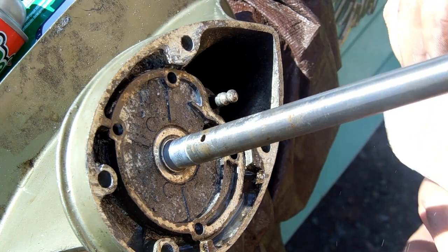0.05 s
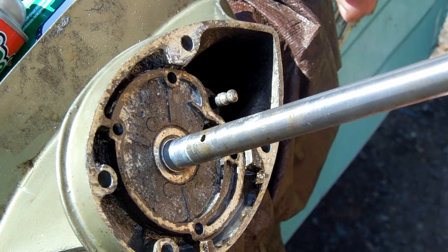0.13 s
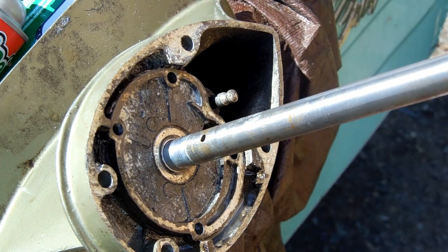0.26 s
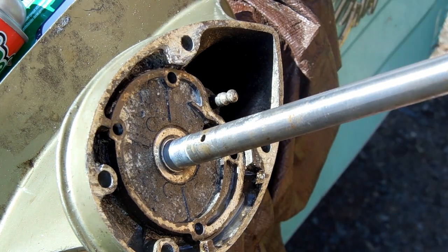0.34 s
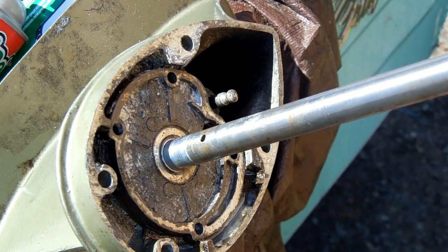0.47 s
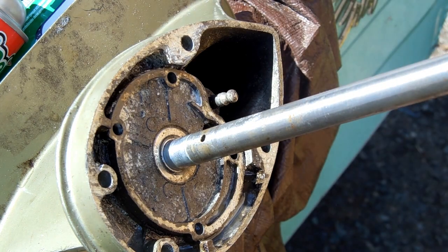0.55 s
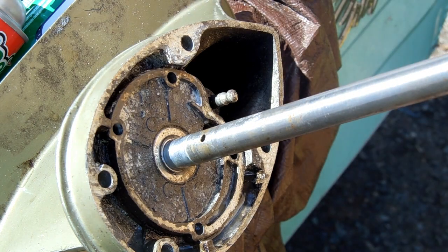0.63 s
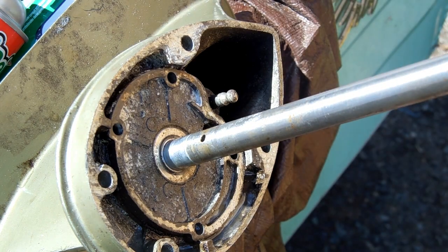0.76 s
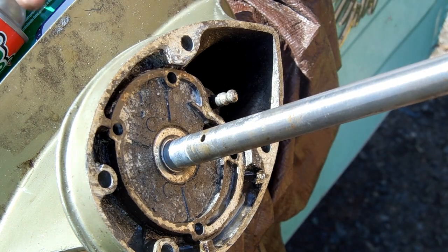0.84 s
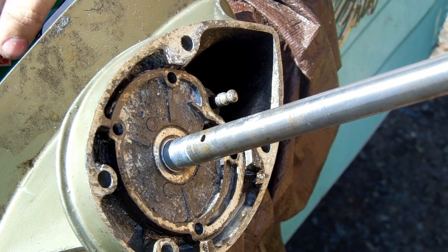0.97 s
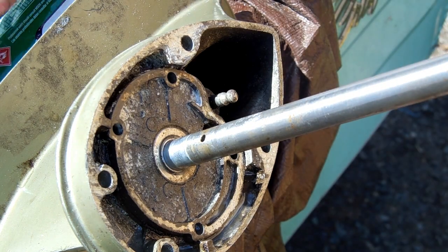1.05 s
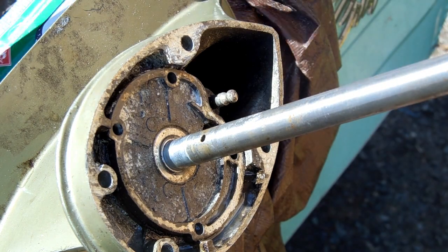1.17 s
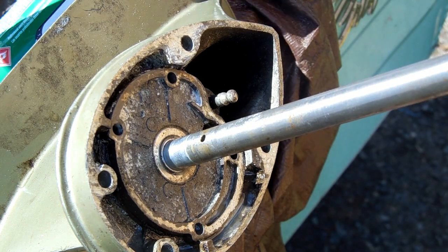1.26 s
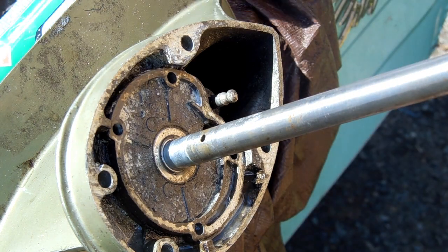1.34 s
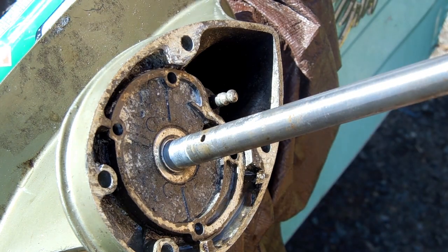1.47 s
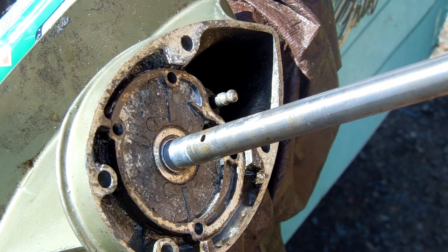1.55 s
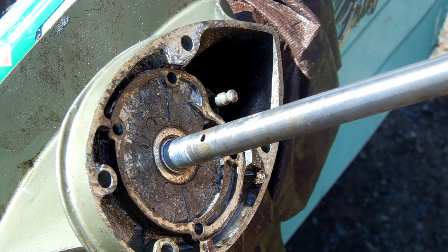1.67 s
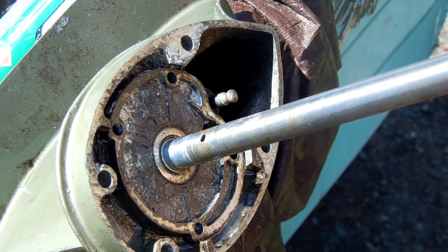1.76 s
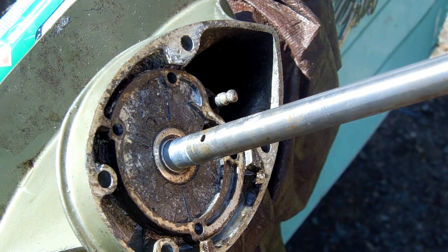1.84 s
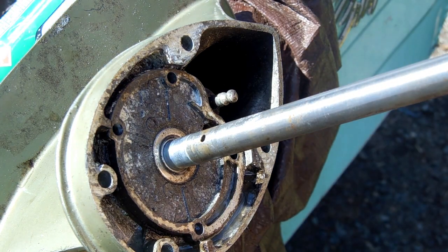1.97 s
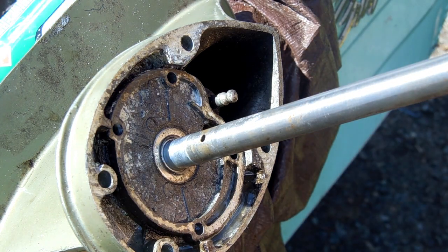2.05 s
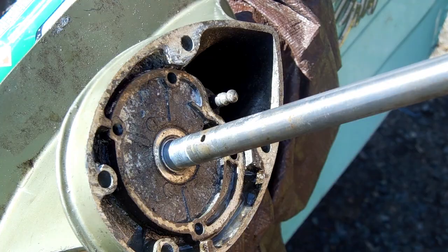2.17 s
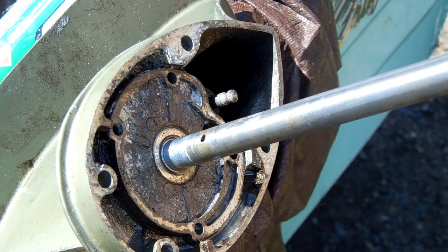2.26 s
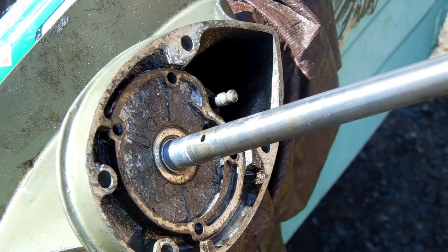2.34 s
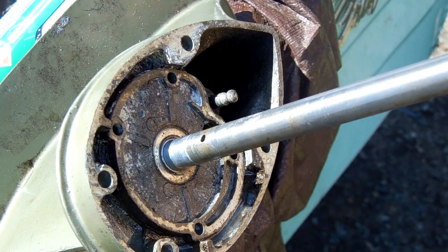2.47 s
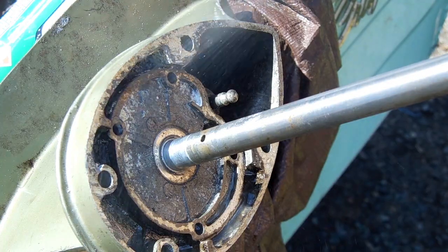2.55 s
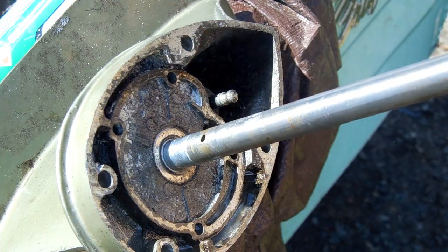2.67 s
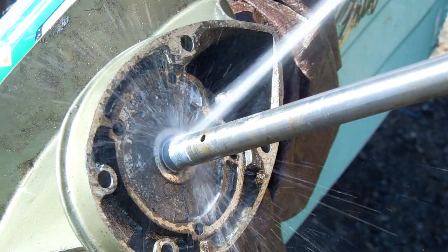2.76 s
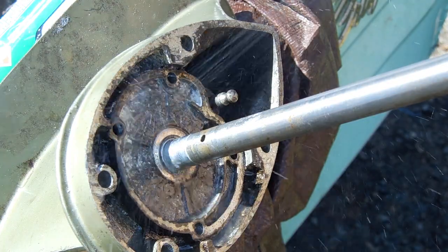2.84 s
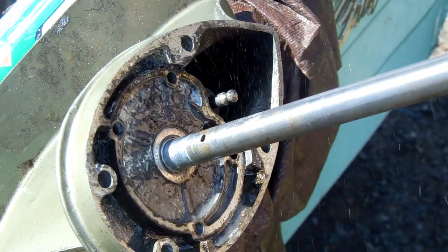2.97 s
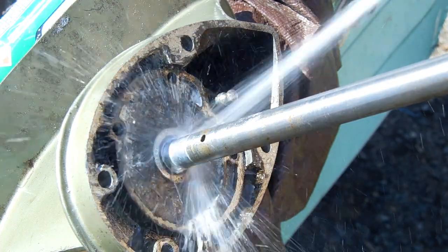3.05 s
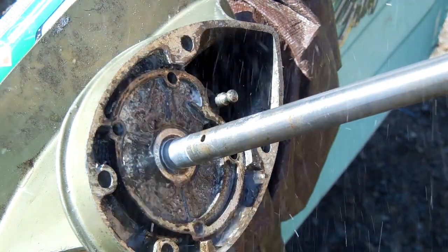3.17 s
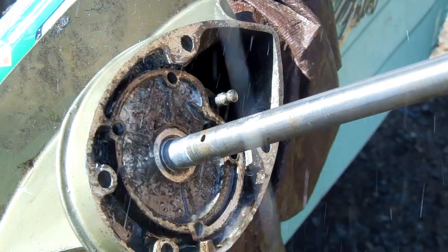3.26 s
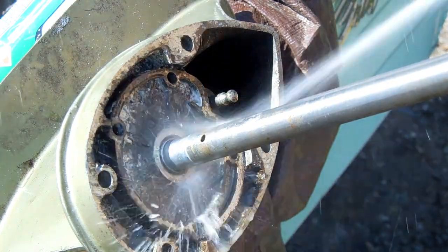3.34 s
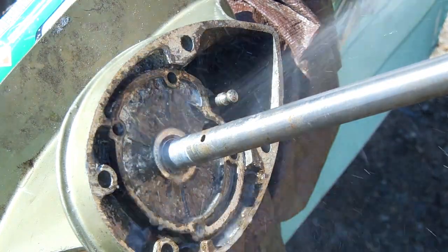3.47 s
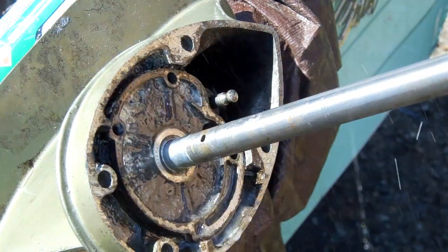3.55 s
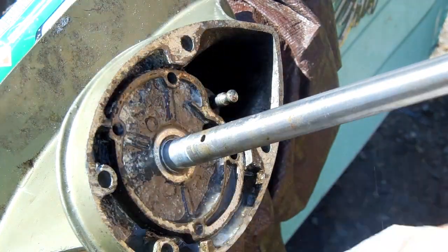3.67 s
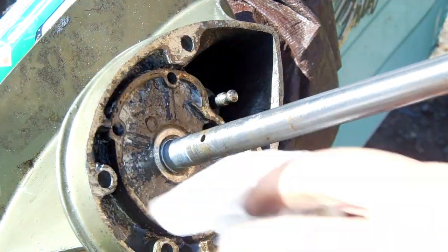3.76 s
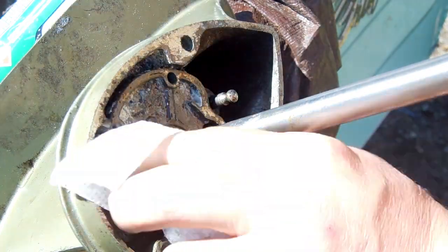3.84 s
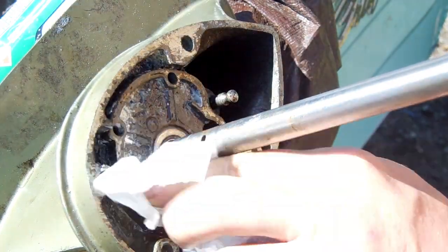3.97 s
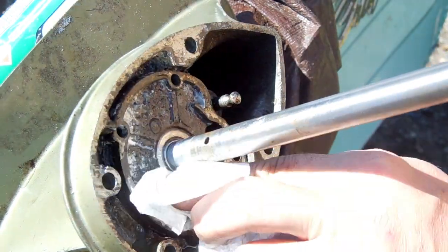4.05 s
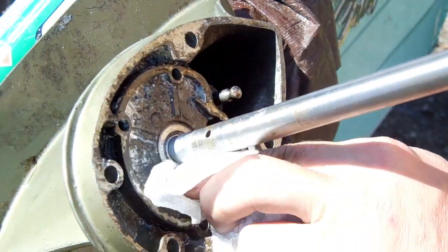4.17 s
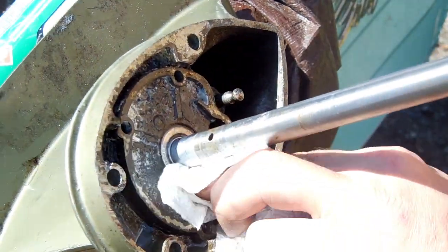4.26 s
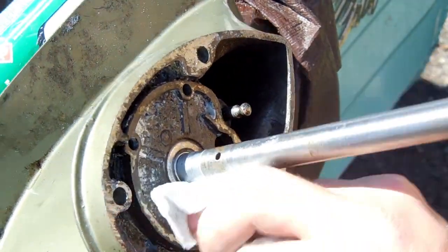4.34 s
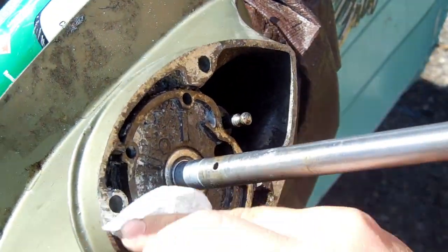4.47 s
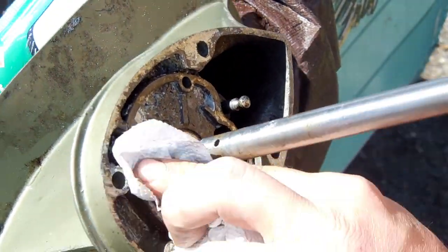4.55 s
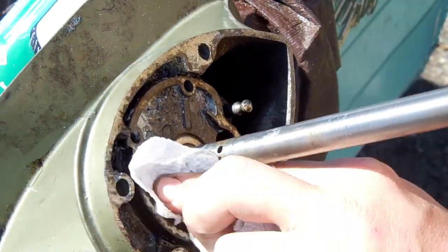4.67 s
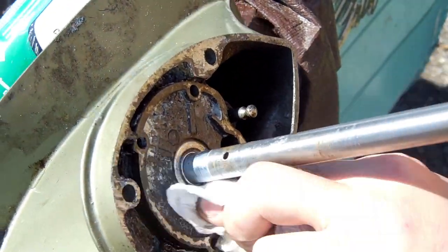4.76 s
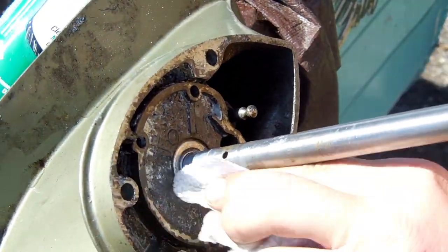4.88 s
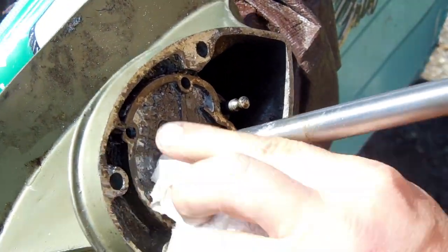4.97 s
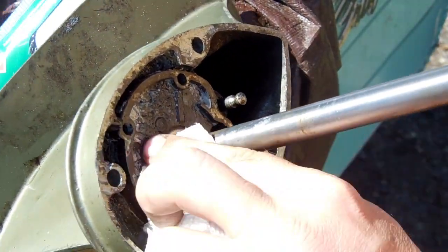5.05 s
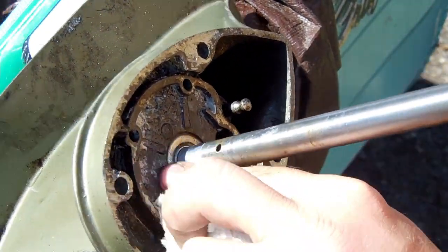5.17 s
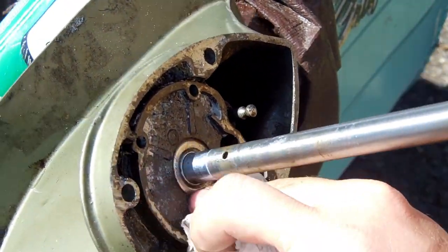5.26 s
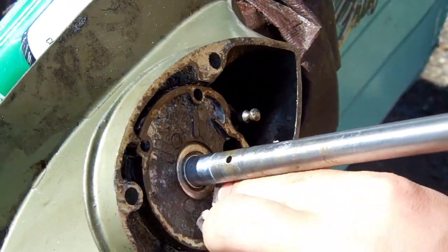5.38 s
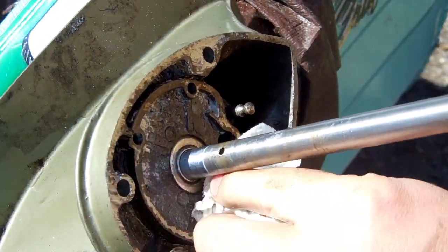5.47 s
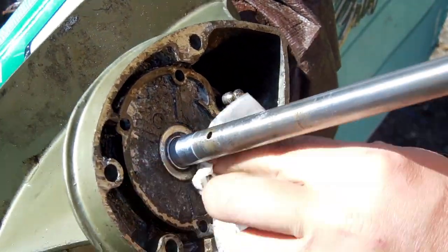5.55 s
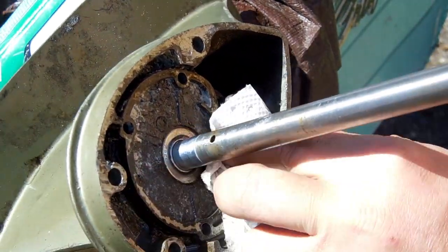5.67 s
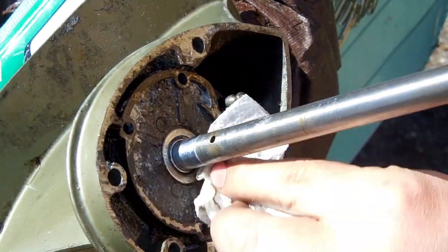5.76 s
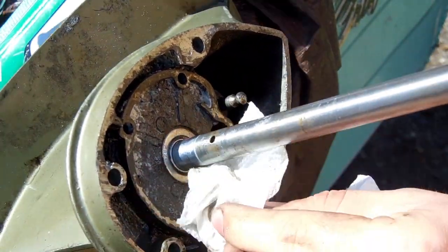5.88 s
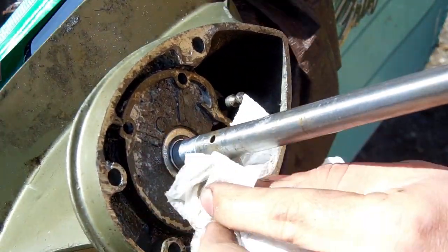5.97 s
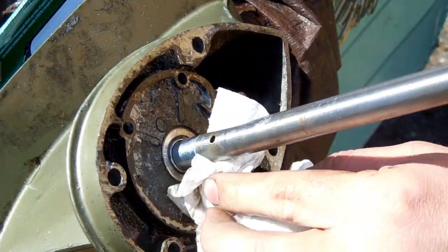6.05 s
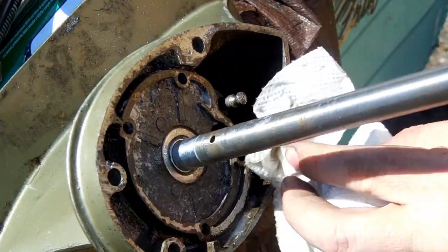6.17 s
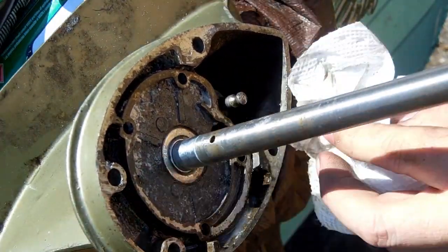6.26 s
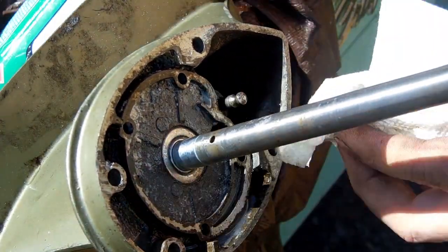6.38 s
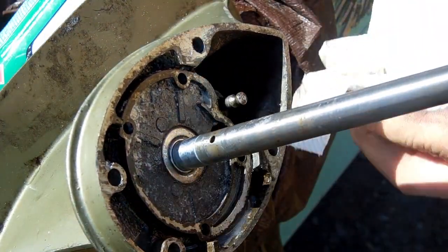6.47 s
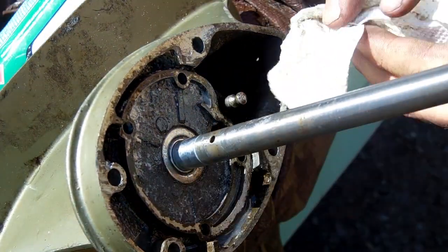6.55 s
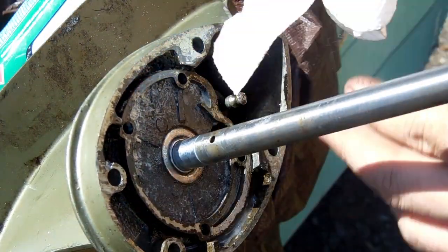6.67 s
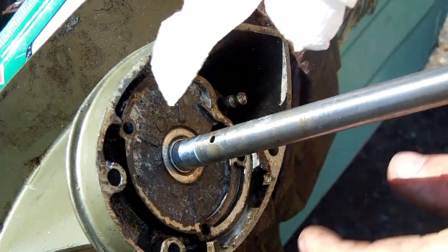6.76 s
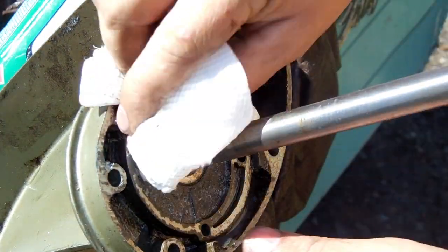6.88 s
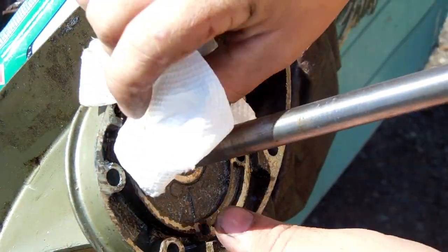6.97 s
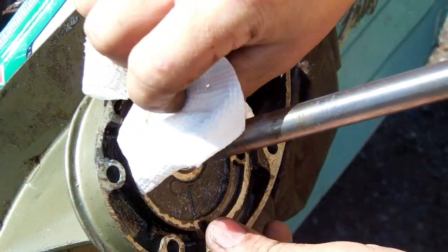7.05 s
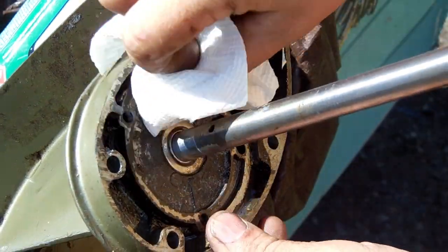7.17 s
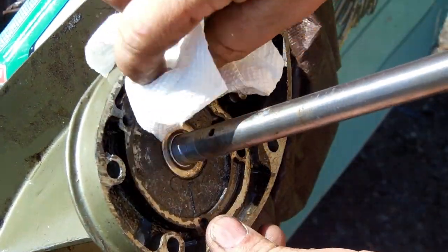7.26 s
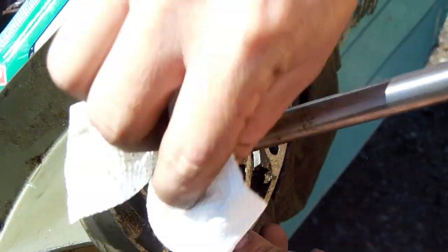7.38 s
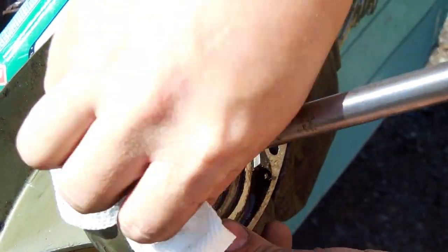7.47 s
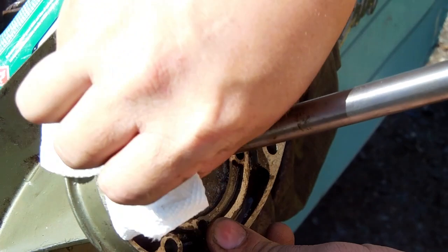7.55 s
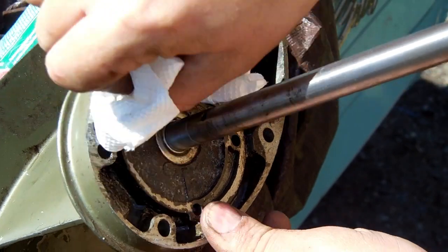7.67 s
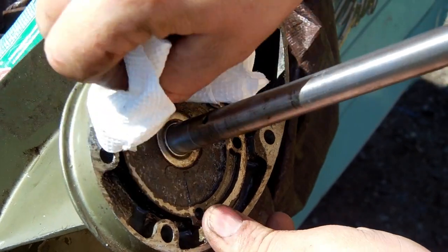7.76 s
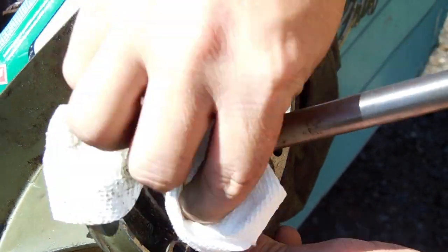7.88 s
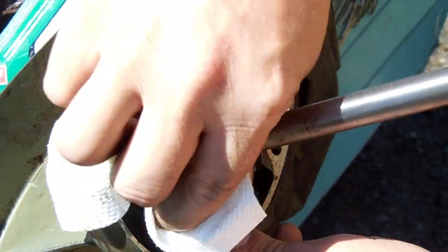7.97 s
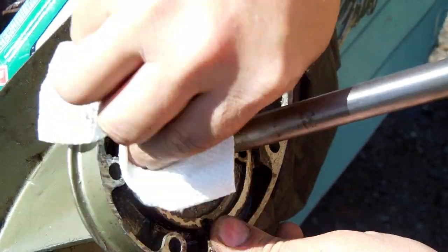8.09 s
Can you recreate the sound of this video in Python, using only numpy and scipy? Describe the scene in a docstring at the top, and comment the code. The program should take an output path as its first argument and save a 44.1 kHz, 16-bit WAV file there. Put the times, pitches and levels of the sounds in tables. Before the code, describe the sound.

Outdoors, paper towel rustles, a spray can is knocked and hisses in short sharp bursts, then rough wiping with metallic clunks and wind buffeting.

```python
"""Outdoors, close to the microphone: a metal gear housing is wiped with a paper towel and sprayed from a can.
At first a far road hums and the towel rustles in a faint breeze; small dry ticks come from 0.6 s on.
At 1.2 s the half-full can is knocked; it rings and glides as its liquid shifts the pitch of its tones.
From 2.65 to 3.6 s the nozzle hisses in short bursts of tiny droplet clicks.
Then come louder wipes, shudders, more knocks and ticks, and puffs of air that buffet the microphone ports."""
import sys
import numpy as np
from scipy import signal
from scipy.fft import rfft, irfft, next_fast_len
from scipy.io import wavfile
from scipy.ndimage import uniform_filter1d

SR = 44100
rng = np.random.default_rng(int(sys.argv[2]) if len(sys.argv) > 2 else 0)


def waveform_to_disk(signal):
    """Save audio, clipped to [-1, 1], as 16-bit WAV at the path in sys.argv[1]."""
    frames = np.transpose(np.atleast_2d(signal))
    scaled = np.clip(frames, -1, 1) * 32767
    samples = np.round(scaled).astype(np.int16)
    wavfile.write(sys.argv[1], SR, samples)


N = 358091
FAST = next_fast_len(N, real=True)  # a length that transforms quickly
T = np.arange(N) / SR  # time of every sample in seconds
BINS = np.maximum(np.fft.rfftfreq(FAST, 1 / SR), 1)  # frequency bins in Hz

# Tone colour of the far road. Each row: frequency in Hz, level in dB.
ROAD_COLOUR = [(15, -31), (25, -5.5), (70, -1.5), (172, -7), (252, -7.5), (330, -6), (378, -5.5), (568, -6),
               (952, -4.5), (1930, -22), (3060, -32), (3320, -30.5), (6040, -28), (15200, -44.5),
               (16500, -61)]
ROAD_LEVEL_DB = -41.5

# Tone colour of moving air. Each row: frequency in Hz, level in dB.
GUST_COLOUR = [(12, 3.5), (30, -0.5), (60, -2.5), (120, -9), (250, -30.5), (500, -50)]
# The breeze between the puffs. Each row: time in seconds, left level in dB.
BREEZE = [(0, -42), (.1, -63), (2.6, -57.5), (3.4, -49.5), (4.4, -44.5), (5.6, -43.5), (6.3, -48),
          (6.8, -42), (8.12, -40)]
BREEZE_PAN_DB = 3  # left minus right
# Puffs of air on the ports. Each row: time in seconds, left level in dB, rise and fall in seconds per 20 dB,
# left minus right in dB.
AIR_PUFFS = [(1.35, -36, 0.12, 0.109, 11.0), (2.256, -40, 0.13, 0.041, 13), (2.779, -35.5, 0.105, 0.07, 9),
             (2.91, -24.0, 0.074, 0.14, 5.5), (3.163, -29.5, 0.054, 0.11, 6),
             (3.624, -29, 0.089, 0.045, 15), (4.567, -32.5, 0.16, 0.026, 5),
             (4.664, -21.5, 0.052, 0.117, 13), (4.94, -21.5, 0.14, 0.121, 12),
             (5.305, -24, 0.18, 0.325, 12), (5.468, -26, 0.034, 0.12, 14), (5.737, -28, 0.1, 0.098, 6),
             (6.032, -33, 0.18, 0.026, 10.0), (6.16, -27, 0.068, 0.026, 13), (6.434, -39, 0.21, 0.186, 4.0),
             (6.583, -27, 0.067, 0.26, 10), (7.056, -24.5, 0.16, 0.041, 5), (7.132, -23.5, 0.046, 0.035, 9),
             (7.187, -24, 0.043, 0.138, 8), (7.317, -24.5, 0.16, 0.022, 10), (7.366, -31, 0.049, 0.15, 16),
             (7.53, -35, 0.22, 0.033, 12), (7.618, -36, 0.12, 0.377, 25), (7.89, -14.5, 0.14, 0.031, 10),
             (8.06, -35, 0.034, 0.089, 14.0)]
# Single dips of pressure. Each row: time in seconds, left and right level in dB before a common gain,
# width setting in ms.
PRESSURE_DIPS = [(1.334, -30, -40, 5), (1.366, -31, -40, 5.4), (2.9094, -16, -35, 2.9),
                 (3.1718, -16, -33, 5.8), (4.618, -14, -28, 2.9), (4.659, -8, -19, 5.2),
                 (4.7049, -12, -32, 4.4), (4.746, -17.5, -34, 5.4), (4.9308, -12, -43, 3.4),
                 (5.1043, -17.5, -33, 4.9), (5.183, -11.5, -28, 2.8), (5.2984, -9.5, -27, 2.6),
                 (5.3125, -15, -48, 3.4), (5.3333, -21, -31, 5.1), (5.347, -13, -39, 2.1),
                 (5.362, -6, -27, 2.4), (5.369, -11, -41, 2.3), (5.4603, -16, -48, 2.9),
                 (6.1045, -10.5, -27, 2.5), (6.1552, -19.5, -40, 3), (6.589, -17.5, -36, 1.3),
                 (6.618, -16, -24, 5.1), (6.984, -16.5, -31, 2.4), (7.0426, -10.5, -21, 1.55),
                 (7.0464, -14, -29, 3.7), (7.2293, -15.5, -29, 2.5), (7.3105, -9.5, -26, 2.5),
                 (7.6303, -16.5, -33, 4.5), (7.8559, -14, -12, 9.5), (7.8756, 0.5, -18, 3.6),
                 (7.8888, -6, -32, 1.7), (7.903, -12, -29, 4.4), (7.9216, -5.5, -29, 2.5),
                 (8.0075, -17, -29, 5.1), (8.0662, -15.5, -35, 3.8)]
STRAY_DIP_DB, STRAY_DIP_MS = 7, 3  # chance dips: highest setting over the air level, middle width setting

# Tone colour of paper on metal. Each row: frequency in Hz, level in dB.
WIPE_COLOUR = [(290, -45), (500, -7.5), (731, -2.5), (859, -2), (924, -12.5), (1680, -6.5), (3020, -5),
               (5350, -7), (7490, -5), (9060, -3.5), (12500, -1), (15800, -6), (16500, -39)]
# Towel strokes. Each row: time in seconds, hiss level in dB, rise in seconds per 20 dB, hold in seconds,
# fall in seconds per 20 dB, setting in dB for the share below 5500 Hz.
TOWEL_STROKES = [(0.03, -39, 0.097, 0.0058, 0.027, -8), (0.097, -36.5, 0.054, 0.012, 0.31, -9),
                 (0.437, -40.0, 0.06, 0.011, 0.174, -8.5), (0.544, -46.5, 0.092, 0.031, 0.212, -4),
                 (0.637, -44.0, 0.019, 0.014, 0.028, -13), (0.728, -39.0, 0.04, 0.0, 0.17, -10.5),
                 (0.82, -51, 0.03, 0.016, 0.03, -9), (1.078, -48.5, 0.102, 0.0, 0.18, -7.5),
                 (1.2, -42, 0.03, 0.029, 0.043, -1), (1.35, -51, 0.083, 0.0044, 0.034, -8),
                 (1.643, -44.5, 0.167, 0.086, 0.02, -5), (1.838, -46.0, 0.443, 0.0, 0.027, -10.0),
                 (1.907, -41, 0.11, 0.025, 0.058, -10), (1.994, -42.0, 0.039, 0.0024, 0.066, -10),
                 (2.104, -41, 0.107, 0.0, 0.016, -8.0), (2.124, -42.5, 0.01, 0.014, 0.04, -11),
                 (2.181, -46, 0.081, 0.0, 0.247, -7.5), (2.494, -45.5, 0.17, 0.0062, 0.092, -10),
                 (2.596, -36.5, 0.028, 0.051, 0.26, -6), (3.722, -46.0, 0.314, 0.013, 0.084, -10),
                 (3.847, -42.5, 0.063, 0.013, 0.027, -9.0), (4.041, -45.5, 0.23, 0.036, 0.24, -7.0),
                 (4.144, -30.5, 0.12, 0.029, 0.043, -9), (4.276, -39.0, 0.082, 0.019, 0.061, -7),
                 (4.423, -35.5, 0.064, 0.02, 0.044, -13.5), (4.552, -31.5, 0.1, 0.0045, 0.12, -6),
                 (4.654, -24, 0.0073, 0.016, 0.023, -8.0), (4.696, -31.5, 0.04, 0.0068, 0.017, -7.0),
                 (4.8, -40.5, 0.22, 0.032, 0.034, -8.5), (4.941, -24.5, 0.093, 0.034, 0.037, -13.0),
                 (5.069, -39, 0.065, 0.0, 0.1, -10.5), (5.173, -43, 0.045, 0.0055, 0.18, -4.5),
                 (5.363, -38.5, 0.04, 0.0074, 0.012, -12), (5.397, -35.5, 0.11, 0.0, 0.11, -3),
                 (5.512, -42, 0.028, 0.027, 0.029, -5), (5.75, -36, 0.112, 0.019, 0.062, -7.5),
                 (5.945, -28, 0.052, 0.0059, 0.071, -20), (6.102, -46.5, 0.1, 0.0, 0.207, -7.0),
                 (6.268, -29.5, 0.033, 0.0049, 0.015, -3), (6.394, -30, 0.2, 0.0054, 0.038, -3.5),
                 (6.47, -48, 0.03, 0.019, 0.05, 0), (6.525, -32.5, 0.015, 0.017, 0.031, -5),
                 (6.607, -34.5, 0.17, 0.025, 0.055, 3), (6.696, -40.5, 0.017, 0.011, 0.018, -8.0),
                 (6.8, -32.5, 0.131, 0.0047, 0.057, -9), (7.05, -36.5, 0.13, 0.02, 0.056, -9),
                 (7.119, -37.5, 0.047, 0.019, 0.024, -12), (7.189, -39.0, 0.039, 0.013, 0.044, -9.0),
                 (7.286, -24.5, 0.047, 0.028, 0.14, -9), (7.364, -32.0, 0.035, 0.0051, 0.012, -9),
                 (7.41, -31.5, 0.0082, 0.022, 0.04, -9.5), (7.59, -32.5, 0.086, 0.0, 0.095, -9.5),
                 (7.626, -40, 0.008, 0.013, 0.013, -7.0), (7.696, -29.5, 0.035, 0.041, 0.079, -7),
                 (7.813, -25.5, 0.057, 0.02, 0.029, -7.0), (7.843, -24.5, 0.027, 0.013, 0.056, -9),
                 (7.995, -32.0, 0.049, 0.0, 0.12, -5.5), (8.053, -39, 0.0073, 0.0098, 0.015, -6)]
TOWEL_REST_DB, TOWEL_REST_LOW_DB = -62, -16  # the towel is never quite still
# Tone colour of the shuddering housing. Each row: frequency in Hz, level in dB.
SHUDDER_COLOUR = [(120, -12), (260, -1), (420, -4), (800, -4), (1300, -10), (2500, -29.5)]
# The housing shudders under the hand. Each row: time in seconds, level in dB, rise and fall in seconds per 20 dB.
SHUDDERS = [(4.66, -37, 0.44, .05), (4.69, -28.5, .03, 0.047), (4.979, -34.5, 0.26, 0.052),
            (5.08, -41.5, .025, 0.081), (5.19, -39, .025, 0.081), (5.3, -34.5, .1, 0.06),
            (5.365, -30, 0.034, 0.13), (5.72, -38, 0.029, 0.11), (5.96, -28, .055, 0.061),
            (6.1, -40.5, 0.094, 0.29), (6.35, -37, 0.055, .35), (6.59, -31.5, 0.018, 0.12),
            (6.79, -43.5, .15, 0.13), (7.03, -41, 0.065, 0.098), (7.29, -41, 0.6, .08),
            (7.88, -32, 0.3, 0.045), (7.92, -36, .03, .02), (8.01, -32, 0.041, 0.033),
            (8.07, -40, .04, 0.03)]

# Dry ticks of small parts and the sharp click of knocks on the can. Each row: start in seconds,
# peak setting in dB, main colour in Hz, seconds for the noisy tail to fade by 60 dB.
TICKS = [(0.6434, -36, 11700, 0.036), (0.921, -37, 3100, 0.031), (1.026, -35, 6820, 0.024),
         (1.112, -24.5, 9000, 0.051), (1.1864, -5, 3960, 0.061), (1.704, -10.5, 6700, 0.09),
         (1.7113, -15, 5240, 0.085), (1.778, -29, 4290, 0.057), (1.8964, -28, 12000, 0.04),
         (1.9929, -30, 5890, 0.044), (2.068, -6, 7850, 0.066), (2.1021, -29, 11700, 0.04),
         (2.1262, -13, 11000, 0.03), (2.2223, -29.5, 4600, 0.099), (2.4912, -32, 8430, 0.037),
         (2.572, -31, 5530, 0.053), (2.86, -20.5, 5100, 0.15), (3.071, -28.5, 5160, 0.041),
         (3.163, -19, 10700, 0.054), (3.466, -28, 5920, 0.054), (4.3415, -31, 9430, 0.034),
         (4.6488, -10, 12000, 0.041), (4.881, -13, 11100, 0.029), (5.4006, -7.5, 10000, 0.045),
         (5.929, -19, 10000, 0.03), (5.9716, -16, 10000, 0.04), (6.1025, -25, 11700, 0.04),
         (6.1953, -28, 3040, 0.04), (6.243, -11, 3200, 0.021), (6.348, -10, 2650, 0.027),
         (6.4553, -14.5, 2640, 0.052), (6.5873, -8.5, 5130, 0.16), (6.6947, -26, 7200, 0.06),
         (7.6625, -34, 12700, 0.048), (7.97, -20, 11000, 0.043), (8.011, -8.5, 7170, 0.024)]
# Ringing tones of small steel parts. Each row: frequency in Hz, level in dB.
STEEL_TONES = [(2750, -2), (3150, -2), (3900, 5.5), (4300, -0.5), (5200, 8), (5750, 3), (6500, 2),
               (7900, -3), (8600, 6), (10300, 4), (11800, 14), (13500, 1)]
SNAP_S = 0.001  # a tick builds up this long before it lets go

# Knocks on the can. Each row: start in seconds, thud level in dB, hollow level in dB, levels in dB of the
# five main tones, ring-time factor left by the grip, rattle level in dB.
CAN_KNOCKS = [(1.187, -38, -50, -35, -55, -55, -53, -36, 0.85, -43),
              (1.219, -29, -30, -31.5, -55, -59, -51.5, -46, 1.56, -53),
              (4.507, -15, -28, -22, -26, -28.5, -38, -43, 0.54, -33),
              (4.650, -13.5, -30, -8, -45, -50, -44, -45.5, .2, -31),
              (4.880, -25.5, -29, -42, -50, -48, -49, -50, 0.16, -38),
              (5.722, -34, -29, -41, -52, -54, -55, -58, .2, -39),
              (6.194, -35, -26, -50, -49, -50, -55, -53, .2, -46),
              (6.243, -20.5, -20.5, -45, -13, -36, -50, -34, 0.39, -29),
              (6.266, -11, -38, -38, -21.5, -42, -34, -42, 0.87, -35),
              (6.349, -8, -40, -20, -25, -31, -20.5, -25, 0.75, -26.5),
              (6.369, -26, -28, -16.5, -31.5, -20.5, -22, -28, 1.3, -19.5),
              (6.456, -8.5, -29, -28, -14.5, -25, -26, -37, 1.1, -28.5),
              (6.588, -33, -11.5, -25, -34, -37, -34, -25, 1.7, -32),
              (6.618, -34, -14, -28, -35, -33, -36, -25, 0.49, -36),
              (7.662, -26, -40, -50, -55, -52, -51, -55, .2, -47)]
# Main tones of the can, set for each knock. Each row: frequency in Hz, seconds to fade by 60 dB before
# the grip factor, share of the wall detuning, share of the base detuning.
CAN_MAIN_TONES = [(1084, 0.29, 0.99, 0.052), (1418, 0.45, 0.13, 0.13), (1555, 0.5, 0.011, 0.079),
                  (2330, 0.48, 0.017, 0.92), (2790, 0.097, 0.026, 0.34)]
# Other tones of the can, set by the rattle level. Each row: frequency in Hz, level against the rattle in dB,
# seconds to fade by 60 dB before the grip factor.
CAN_OTHER_TONES = [(1870, -3, 0.13), (2190, -10, .15), (2710, -7, 0.28), (3110, -8, 0.28),
                   (3090, -24.5, 0.27), (3570, -28, 0.18), (4220, -19, 0.21), (4350, -10.5, 0.16),
                   (5400, -12, .15), (5430, -28, 0.18), (7000, -17, .2)]
# Liquid running inside detunes the can. Each row: time in seconds, wall detuning in %, base detuning in %.
LIQUID_DETUNING = [(1.19, 13, -3), (1.21, 17.5, 4), (1.235, 27.5, 5.5), (1.26, 29, 4.5), (1.32, 26.5, 2.5),
                   (1.55, 32.5, 4), (4.5, 5.5, 9), (4.7, 8.5, -3), (6.24, 7, 10), (6.28, 4, 4),
                   (6.33, 9, -7), (6.35, 6, -1), (6.39, -1.5, -2.5), (6.44, 6, 4.5), (6.46, 9, 2),
                   (6.55, 2, 0), (6.62, -4, 1.5), (6.68, 3, -0.5)]
# Tone colour of the rattle. Each row: frequency in Hz, level in dB.
RATTLE_COLOUR = [(700, -8), (1250, 9.5), (1700, 1), (2200, -9), (3000, -6.5), (3800, -17), (6000, -29)]
# Tones of the thud. Each row: frequency in Hz, level against the thud in dB, seconds to fade by 60 dB.
THUD_TONES = [(1254, 0.5, 0.043), (2000, -10.5, 0.033)]
HOLLOW_HZ, HOLLOW_T60_S = 383, 0.018

# Tone colour of the spray. Each row: frequency in Hz, level in dB.
SPRAY_COLOUR = [(180, -50), (300, -22), (717, -24.5), (863, -20), (1660, -19.5), (1800, -18), (3240, -14.5),
                (4240, -16), (4690, -8.5), (5830, -14), (7890, -11.5), (11000, 1), (13300, -6), (15400, -5),
                (16500, -49)]
# Pushes on the nozzle. Each row: opening time in seconds, shutting time in seconds, opening level in dB,
# settled level in dB, leak level in dB just before opening.
NOZZLE_PUSHES = [(2.652, 2.725, -20, -15, -37), (2.892, 2.97, -5, -12.5, -23), (2.972, 3.017, -6, -12, -40),
                 (3.182, 3.28, -6, -15, -25), (3.29, 3.303, -9.5, -9.5, -9), (3.509, 3.629, -9, -11.5, -44)]
# Two brief bright wiping hisses, shaped like the spray. Each row: start in seconds, end in seconds,
# first level in dB, settled level in dB, level in dB just before the start.
BRIGHT_HISSES = [(4.883, 4.974, -24.5, -45, -70), (5.935, 5.967, -34, -29, -70)]
OPEN_DB_S, SHUT_DB_S, LEAK_DB_S = 2500, 1197, 507  # dB per second: hiss starts, hiss stops, leak builds
SETTLE_S = 0.023  # time constant as the first level evens out
DRIP_DB, DRIP_DB_S = -26, 243  # fizz after the end: dB against the settled level, fade in dB per second
SPLASH_DB, SPLASH_SLOPE = -16.5, 0.35  # low-share setting at a level of -11 dB; it shrinks as the hiss grows

# How the right port hears the scene. Each row: frequency in Hz, # loss in dB, likeness to the left from 0 to 1.
RIGHT_PORT = [(102, 5, 0.84), (600, 7, 0.83), (1230, 7, 0.75), (1600, 5, 0.6), (2540, 2.5, 0.56),
              (3300, 3, 0.6), (5300, 7, 0.21), (7360, 5.5, 0.4), (8900, 8, 0.26), (10200, 9, 0.5),
              (13100, 11.5, 0.1), (15000, 15, 0)]
TOP_HZ = 15900  # the recorder's upper limit


def undb(db):
    """Turn decibels into a gain."""
    return 10 ** (np.asarray(db) / 20)


def level(x, db):
    """Set the average strength (rms) of a sound in dB."""
    return x * undb(db) / np.sqrt(np.mean(x ** 2))


def fade(t, t60):
    """Die away by 60 dB in t60 seconds, as a ringing object does."""
    return np.exp(-np.log(1000) * t / np.clip(t60, .003, None))


def add(out, s, x):
    """Mix a short sound in at time s."""
    i = int(s * SR)
    out[..., i:i + x.shape[-1]] += x[..., :N - i]


def along(table, column=1):
    """Read a table column at every frequency bin."""
    table = np.array(table)
    return np.interp(np.log(BINS), np.log(table[:, 0]), table[:, column])


def colour(x, table):
    """Shape the tone of a noise by making some frequencies stronger than others."""
    return irfft(rfft(x, FAST) * undb(along(table)), FAST)[..., :N]


def curves(table):
    """Read every column of a timed table at every sample."""
    s, *columns = np.array(table, float).T
    return [np.interp(T, s, column) for column in columns]


def walk(rate):
    """Wander at random with about rate new values a second, joined smoothly; spread near 1."""
    held = uniform_filter1d(rng.standard_normal(int(N / SR * rate) + 3), 2)
    return 1.6 * np.interp(T * rate, np.arange(len(held)), held)


def swells(rows, rest_db, rest_value=0.):
    """Sum the power of events (s, dB, rise, hold, fall, value) over a rest; the value leans to the loudest."""
    t = T[::32]  # coarse time steps are enough for slow swells
    power = (undb(rest_db) ** 2 + np.zeros(N))[::32]
    value = power * rest_value
    for s, db, rise, hold, fall, own in rows:
        before = (s - t) / max(rise, .004)
        after = (t - s - hold) / max(fall, .004)
        away = np.maximum(np.maximum(before, after), 0)
        mine = undb(db - 20 * away) ** 2
        power = power + mine
        value = value + mine * own
    return np.interp(T, t, 10 * np.log10(power)), np.interp(T, t, value / power)


def flicker(x, colours, step, together_db, alone_db, slow_db, rate):
    """Colour a noise in bands of step octaves whose levels wander together, alone and slowly."""
    spectrum = rfft(x, FAST) * undb(along(colours))
    out, together = 0, walk(rate)
    low, top = np.log2(colours[0][0]), np.log2(colours[-1][0])
    for octave in np.arange(low, top + step, step):
        distance = np.clip((np.log2(BINS) - octave) / step, -1, 1)
        band = np.cos(np.pi / 2 * distance) ** 2
        wander_db = together_db * together + alone_db * walk(rate) + slow_db * walk(rate / 8)
        out = out + irfft(spectrum * band, FAST)[:, :N] * undb(wander_db)
    return out


def grains(colours, db, low_db, usual_db, scatter_db, together_db, alone_db, slow_db, rate):
    """Build a hiss from dense tiny clicks of unequal size, with its own level below 5500 Hz."""
    sizes = undb(scatter_db * np.minimum(rng.exponential(size=N), 5))
    clicks = rng.standard_normal((2, N)) * sizes  # a straight and a scattered part
    dust = flicker(clicks, colours, 0.5025, together_db, alone_db, slow_db, rate)
    low = signal.sosfiltfilt(signal.butter(2, 5500, fs=SR, output="sos"), dust)
    high = dust - low
    return (low * undb(low_db - usual_db) + high) * undb(db) / np.std(high)


def road():
    """Far traffic: a steady low noise that swells and flickers a little."""
    noise = rng.standard_normal((2, N))
    hum = flicker(noise, ROAD_COLOUR, 0.96, together_db=0.9, alone_db=1.14, slow_db=0.25, rate=9)
    return level(hum, ROAD_LEVEL_DB)


def wind():
    """Air swirls past the ports, partly shared by both, with single dips of pressure."""
    puffs = [(s, db, rise, 0, fall, pan_db) for s, db, rise, fall, pan_db in AIR_PUFFS]
    db, pan_db = swells(puffs, curves(BREEZE)[0], BREEZE_PAN_DB)
    shared, left, right = level(colour(rng.standard_normal((3, N)), GUST_COLOUR), 0)
    left_air = 0.82 * shared + 0.89 * left * undb(2.9 * walk(25))
    right_air = 0.78 * shared + 0.73 * right * undb(1.9 * walk(23))
    air = np.array([left_air, right_air]) * undb(np.array([db, db - pan_db]))

    strays = []
    for when, size, width in rng.random(size=(60, 3)):
        i = int(SR // 10 + when * (N - SR // 5))
        left_db = db[i] + STRAY_DIP_DB - 10 * size
        strays.append((T[i], left_db, left_db - pan_db[i], STRAY_DIP_MS * (.5 + width)))

    dips, t = np.zeros((2, N)), T[:SR // 10] - .05  # each dip is deepest at t = 0
    for s, left_db, right_db, ms in list(PRESSURE_DIPS) + strays:
        dip = -1 / (1 + (t / (0.55 * ms / 1000)) ** 2) ** 1.7
        add(dips, s - .05, 1.25 * np.outer(undb([left_db, right_db]), dip))
    # the capsule vent lets each dip swing back
    return air + signal.sosfilt(signal.butter(1, 14, "high", fs=SR, output="sos"), dips)


def towel():
    """Paper fibres slip over rough wet metal, and the housing shudders under the hand."""
    db, low_db = swells(TOWEL_STROKES, TOWEL_REST_DB, TOWEL_REST_LOW_DB)
    hiss = grains(WIPE_COLOUR, db + 1.13 * walk(90), low_db, usual_db=-7.5, scatter_db=3.1,
                  together_db=1.33, alone_db=2.0, slow_db=.9, rate=80)
    rumble = level(colour(rng.standard_normal((2, N)), SHUDDER_COLOUR), 0) * undb(1.86 * walk(60))
    shudders = [(s, db, rise, 0, fall, 0) for s, db, rise, fall in SHUDDERS]
    shudder_db, _ = swells(shudders, -84)
    return hiss + rumble * undb(shudder_db)


def ticks():
    """A sharp crack, then steel tones near its colour ring out with a noisy tail."""
    out, t = np.zeros((2, N)), T[:SR // 8]
    tone_hz, tone_db = np.transpose(STEEL_TONES)
    released = t > SNAP_S
    for s, db, hz, t60 in TICKS:
        crack = np.exp(-np.abs(t - SNAP_S) / 0.0007)
        tail = 0.27 * released * fade(t, t60)
        burst = rng.standard_normal((2, len(t))) * (crack + tail)
        edges = [hz / 1.75, min(hz * 2.86, .45 * SR)]
        burst = signal.sosfilt(signal.butter(2, edges, "band", fs=SR, output="sos"), burst)

        detune, scatter = rng.standard_normal((2, len(tone_hz)))
        octaves_away = np.log2(tone_hz / hz)
        reach_db = tone_db + 2 * scatter - 18 * octaves_away ** 2  # far tones are hardly struck
        waves = np.sin(2 * np.pi * np.outer(t, tone_hz * (1 + 0.015 * detune)))
        burst = burst + 0.11 * waves @ undb(reach_db) * released * fade(t, 0.47 * t60)
        add(out, s, 1.03 * undb(db) * burst / np.abs(burst[0]).max())
    return out


def can():
    """Each knock gives a thud and a rattle, and rings the wall at the pitch that the liquid allows."""
    out, t = np.zeros((2, N)), T[:SR // 3]
    wall, base = np.array(curves(LIQUID_DETUNING)) / 100  # from % to fractions
    rattle = level(colour(rng.standard_normal((2, N)), RATTLE_COLOUR), 0) * undb(0.72 * walk(150))
    following = [knock[0] for knock in CAN_KNOCKS[1:]] + [T[-1]]
    for (s, thud_db, hollow_db, *tones_db, grip, rattle_db), next_s in zip(CAN_KNOCKS, following):
        i = int(s * SR)
        ring = 0
        for (hz, t60, of_wall, of_base), own_db in zip(CAN_MAIN_TONES, tones_db):
            detune = (of_wall * wall + of_base * base)[i:i + len(t)]
            phase = 2 * np.pi * np.cumsum(hz * (1 + detune)) / SR
            waver = undb(2.5 * walk(50)[:len(t)])  # each tone wavers at random in strength
            ring = ring + undb(own_db) * waver * np.sin(phase) * fade(t, t60 * grip)
        for hz, own_db, t60 in CAN_OTHER_TONES:
            detune, scatter = rng.standard_normal(2)
            wave = np.sin(2 * np.pi * hz * (1 + 0.0091 * detune) * t)
            ring = ring + undb(rattle_db + own_db + 3 * scatter) * wave * fade(t, t60 * grip)
        ring = ring * (1 - np.exp(-t / .0015))  # soft start
        ring = ring * fade(np.maximum(t + s - next_s, 0), .03)  # the next contact stops the ring

        for hz, own_db, t60 in THUD_TONES:
            wave = np.sin(2 * np.pi * hz * (1 + 0.025 * rng.standard_normal()) * t)
            ring = ring + undb(thud_db + own_db) * wave * fade(t, t60)
        hollow = np.sin(2 * np.pi * HOLLOW_HZ * t) * fade(t, HOLLOW_T60_S)
        ring = ring + undb(hollow_db) * hollow
        both = np.array([ring, 0.047 * np.roll(ring, SR // 3000)])  # the scattered part comes a little late
        add(out, s, both + undb(rattle_db) * rattle[:, i:i + len(t)] * fade(t, 0.22))
    return out


def spray_and_bright_hisses():
    """Nozzle spray, and two brief bright wiping hisses, each built from dense tiny clicks."""
    db = np.full(N, -120.)
    for opens, shuts, opening_db, settled_db, leak_db in list(NOZZLE_PUSHES) + list(BRIGHT_HISSES):
        early, late = np.maximum(opens - T, 0), np.maximum(T - shuts, 0)
        settling = np.exp(-np.maximum(T - opens, 0) / SETTLE_S)
        main = settled_db + (opening_db - settled_db) * settling
        main = main - OPEN_DB_S * early - SHUT_DB_S * late
        leak = np.where(T < opens, leak_db - LEAK_DB_S * early, -120)
        drip = np.where(T > shuts, settled_db + DRIP_DB - DRIP_DB_S * late, -120)
        db = np.max([db, main, leak, drip], axis=0)
    low_db = np.minimum(SPLASH_DB - SPLASH_SLOPE * (db + 11), -3)
    return grains(SPRAY_COLOUR, db + 0.84 * walk(60), low_db, usual_db=-13.5, scatter_db=1.5,
                  together_db=-1.3, alone_db=0.9, slow_db=1.5, rate=160)


def ports(x):
    """The left port hears the straight part; the right one is softer and takes in the scattered part."""
    straight, scattered = rfft(x, FAST)
    like = np.clip(along(RIGHT_PORT, column=2), 0, 1)
    mixed = like * straight + np.sqrt(1 - like ** 2) * scattered
    right = undb(-along(RIGHT_PORT)) * mixed
    return np.array([x[0], irfft(right, FAST)[:N]])


def scene():
    """All airborne sound reaches both ports; wind acts on each port itself."""
    airborne = road() + towel() + ticks() + can() + spray_and_bright_hisses()
    return ports(airborne) + wind()


def record(dry):
    """The recorder rounds the loudest peaks and cuts the top of the treble."""
    rounded = .85 * np.tanh(dry / .85)
    return signal.sosfilt(signal.ellip(8, .2, 70, TOP_HZ, fs=SR, output="sos"), rounded)


dry = scene()
out = record(dry)
waveform_to_disk(out)
```